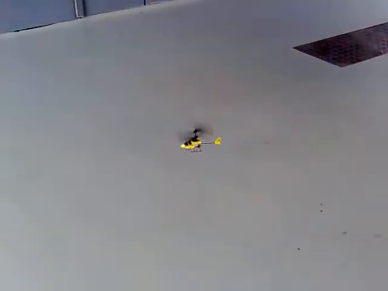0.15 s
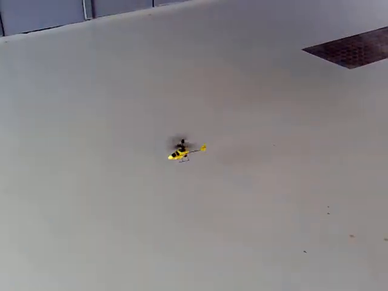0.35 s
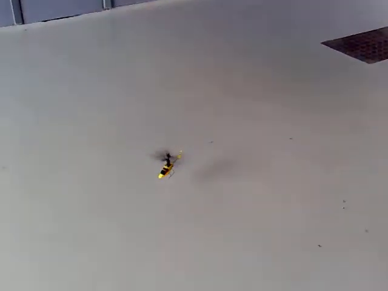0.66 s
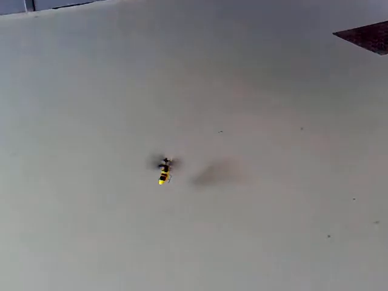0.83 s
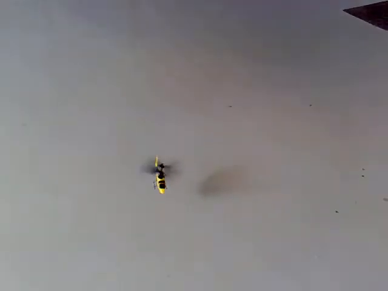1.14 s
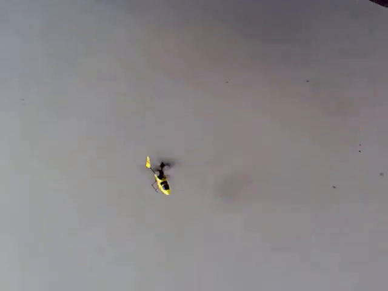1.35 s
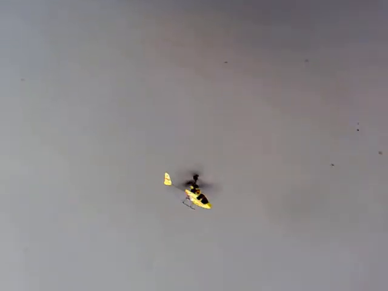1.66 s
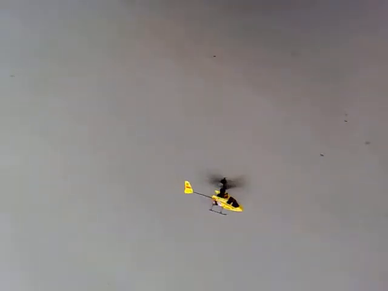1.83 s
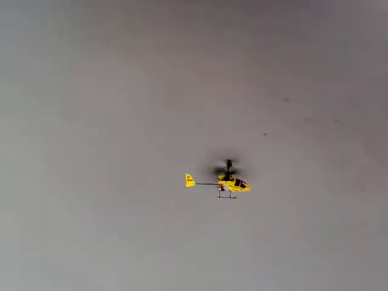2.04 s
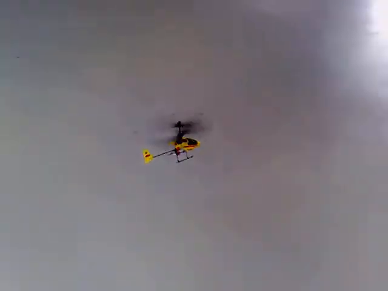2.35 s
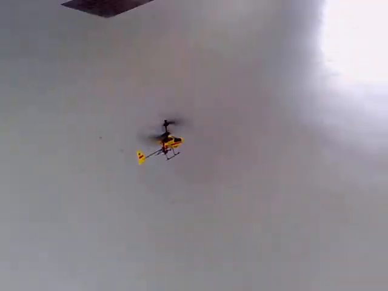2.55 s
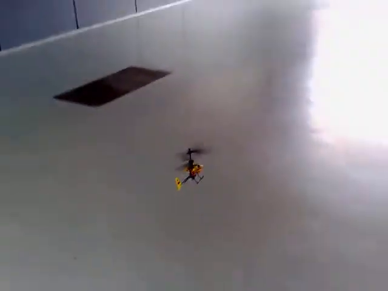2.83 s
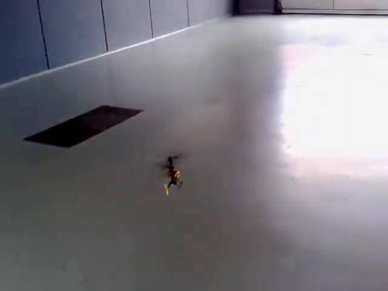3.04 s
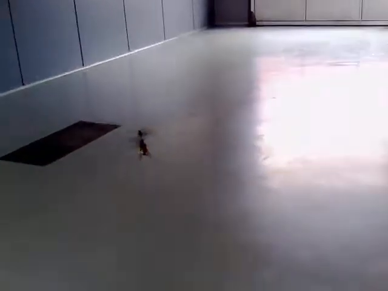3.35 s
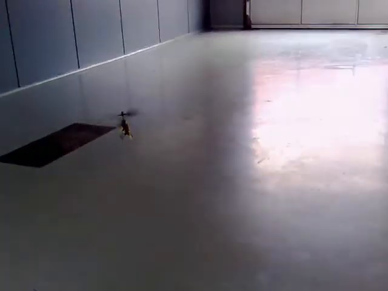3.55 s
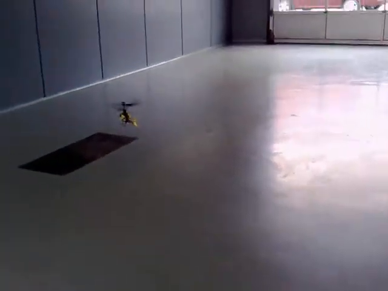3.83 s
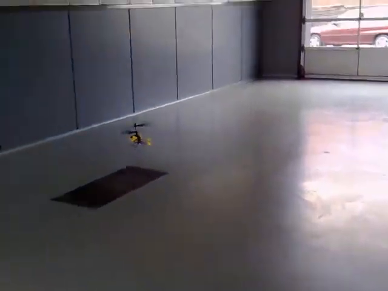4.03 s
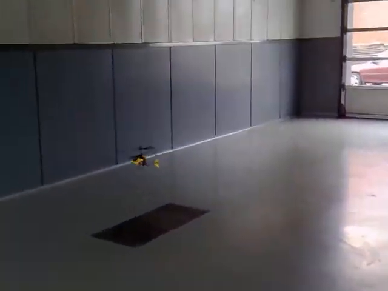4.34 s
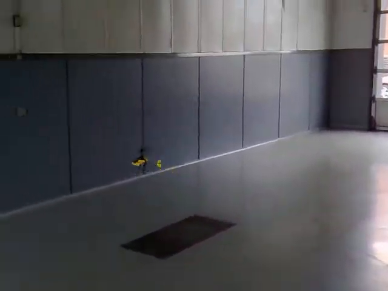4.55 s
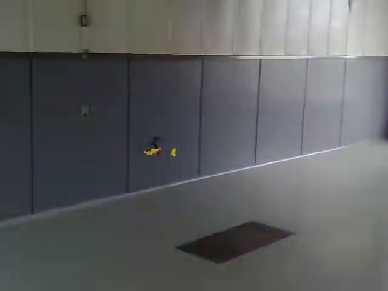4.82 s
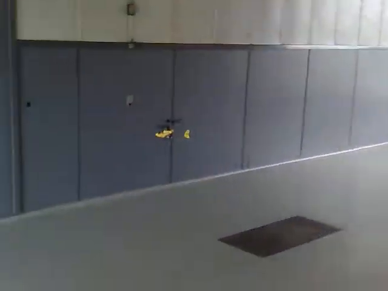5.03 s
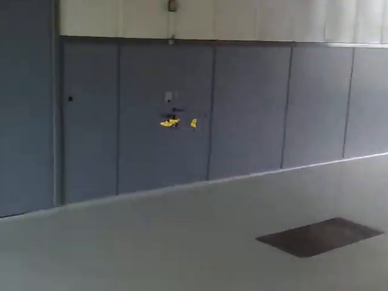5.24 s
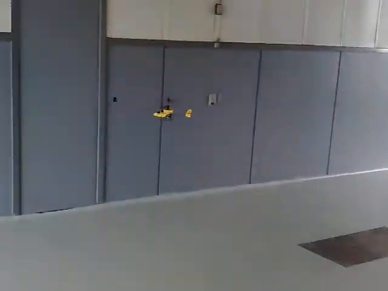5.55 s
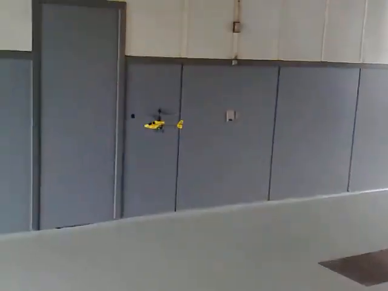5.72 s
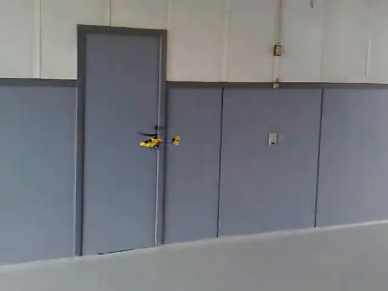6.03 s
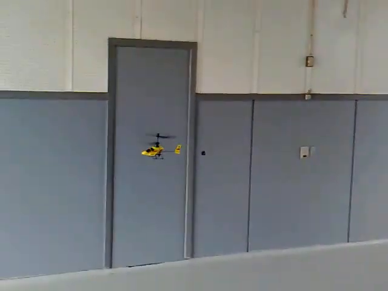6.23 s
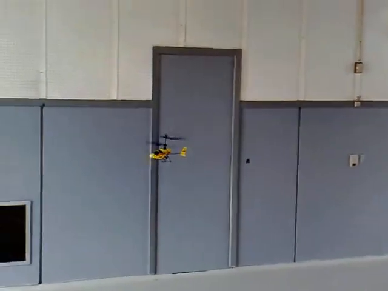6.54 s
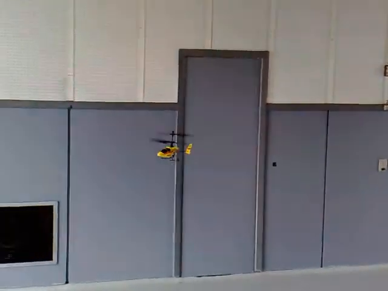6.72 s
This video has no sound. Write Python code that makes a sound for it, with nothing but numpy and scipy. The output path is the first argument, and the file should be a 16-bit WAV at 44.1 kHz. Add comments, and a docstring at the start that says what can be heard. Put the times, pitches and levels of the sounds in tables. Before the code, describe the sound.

A large, hard-surfaced indoor hall with low air rumble and a faint wavering drone. From the start a micro electric helicopter sounds a thin, high, slightly beating whine with light brush and blade hiss; a tiny servo squeal and very high whistles pass in the first second or so, with soft bumps nearby. At about 1.5 seconds a larger, louder model starts unseen with jolting gear clatter. Its rattle becomes a rising whine, with quickening ticks most evident between 2.2 and 4 seconds, and sizzle and rasp growing brighter. Gear tones sweep upward, swelling as they meet resonances. Small taps occur around 2.5 and 3.7 seconds, and a sharp click at about 4.2. By 4.5 seconds the pitch levels off, and a dense, metallic, buzzing whine with weaker ticking holds, swelling briefly near 6 seconds, until the end at nearly 7 seconds.

```python
"""Two model helicopters in an echoing hall

A micro electric helicopter whines: sines locked to its two motor shafts, with noise for its hiss.
After a second and a half a larger, louder model spins up out of sight and holds its speed.
Its gear teeth sing as shaft-locked tones swept through resonances, and rattle as filtered noise.
A pulse once a turn of its main gear makes the ticking; rumble, a drone and bumps lie behind."""
import sys
import numpy as np
from scipy import signal
from scipy.fft import rfft, irfft, next_fast_len
from scipy.io import wavfile
from scipy.ndimage import uniform_filter1d

SR = 44100
rng = np.random.default_rng(int(sys.argv[2]) if len(sys.argv) > 2 else 0)


def dump_mix(stems):
    """Bounce the given channels to the path in sys.argv[1] as a 16-bit WAV at rate SR."""
    frames = np.atleast_2d(stems).T  # one column per channel
    limited = np.clip(frames, -1, 1)  # hard clip at full scale
    pcm = np.round(limited * 32767).astype(np.int16)
    wavfile.write(sys.argv[1], SR, pcm)


N = 303408
TIME = np.arange(N) / SR  # s

# Moving air, in the still hall and in the rotor's wash. Each row: frequency in Hz, relative density in dB.
AIR_SPECTRUM = [(20, -0.5), (35, -1), (60, -3.5), (90, -6), (160, -3), (260, -5.5), (400, -8), (650, -7.5),
                (1000, -7.5), (3000, -28.5)]
# Decay of the reverberation. Each row: frequency in Hz, time to fall by 60 dB in s.
HALL_T60 = [(200, 0.32), (1500, 0.99), (4000, 0.4), (12000, 0.3)]
# Low drone that comes and goes. Each row: time in s, fundamental in Hz, level in dB.
DRONE = [(.5, 56, -69), (.66, 59.4, -55.5), (.85, 50.8, -64.5), (1.1, 53.2, -58.5), (1.35, 55.4, -60),
         (1.65, 61.3, -57), (1.9, 63.6, -67.5), (2.5, 67.3, -64), (2.8, 67.1, -72)]
# Soft bumps and taps nearby. Each row: start in s, level in dB, pitch in Hz, decay time in s.
BUMPS = [(.835, -53, 890, 0.024), (1.155, -50, 246, 0.06), (2.092, -54, 135, 0.21),
         (2.419, -43.5, 104, 0.053), (2.58, -44, 406, 0.027), (2.694, -47.5, 310, 0.1),
         (3.698, -44.5, 400, 0.015), (4.242, -21.5, 2950, 0.0091)]

# Micro motors, trimmed against each other to steer.
# Each row: time in s, upper motor in turns per s, lower motor in turns per s.
MICRO_SPEED = [(0, 390, 343), (.5, 395.8, 338.6), (.76, 390.2, 345.8), (1.02, 390.4, 348),
               (1.25, 394.5, 361), (1.55, 399, 366.3), (2.6, 393.5, 364)]
# Loudness of the micro helicopter as it turns and comes closer. Each row: time in s, gain in dB.
MICRO_LEVEL = [(0, 4), (.4, 3.5), (.65, -2.5), (1.15, -2), (1.4, 1.5), (1.7, -0.5), (2.3, 7.5), (4.0, -5.5),
               (6.88, 6)]
# Partials of the micro motors. Each row: multiple of the shaft speed, relative level in dB.
MICRO_UPPER_ORDERS = [(4, -12), (5, -3), (7, -11.5), (8, -16), (12, -12.5), (14, -14.5), (21, -21)]
MICRO_LOWER_ORDERS = [(5, 1), (7, -13), (10, -12), (14, -14), (15, -25)]
# Brush and blade hiss. Each row: frequency in Hz, relative density in dB.
MICRO_HISS_SPECTRUM = [(700, -41), (1200, -7.5), (1600, 3.5), (2000, 5.5), (2500, -3.5), (3500, -1.5),
                       (4700, -0.5), (5800, -2.5), (7200, -10), (10000, -12), (12000, -5), (16000, -12)]
# Short squeal of the steering servo. Each row: time in s, pitch in Hz, level in dB.
SERVO_SQUEAL = [(.2, 5470, -70), (.3, 5500, -54), (.4, 5535, -51.5), (.5, 5550, -55.5), (.6, 5540, -72)]
# Thin whistles as it steers. Each row: start in s, length in s, start pitch in Hz, end pitch in Hz, level in dB.
WHISTLES = [(0.074, 0.63, 11300, 12600, -61), (1.2, 0.4, 13000, 12600, -57)]

# Throttle run of the large model.
# Each row: time in s, first motor in turns per s, second motor in turns per s.
SPEED = [(1.5, 70, 84), (1.8, 90.4, 108), (2.12, 118.3, 140), (2.85, 168.5, 189), (3.32, 188.3, 214.5),
         (3.47, 194.3, 226.3), (3.75, 205, 240.5), (3.92, 214.3, 246), (4.3, 231, 264), (4.52, 234.6, 267),
         (5.2, 234.5, 268.3), (5.8, 236.3, 265.3), (6.3, 237.7, 264.7), (6.88, 235.8, 264.8)]
# Tooth-mesh tones before resonance.
# Each row: multiple of the shaft speed, level at full speed in dB, rise in dB per octave of speed.
FIRST_MESH = [(8, -34, -1), (16, -33, -1.5), (24, -43, 0)]
SECOND_MESH = [(8, -36.5, 4.2), (16, -34.5, 11)]
# Weaker partials of uneven teeth. Each row: multiple of the shaft speed, relative level in dB.
FIRST_SIDE = [(4, -5.5), (7, -8.5), (9, 1), (10, -3.5), (12, -4.5), (17, -6), (18, -3), (19, -6.5),
              (20, -16), (27, -12.5), (32, -12)]
SECOND_SIDE = [(9, -34), (15, -7), (17, -8), (40, -9.5)]
# Gearbox resonances swept by the mesh tones. Each row: centre in Hz, width in Hz, gain in dB.
GEARBOX = [(1100, 260, 4), (1380, 100, 1), (1650, 186, 5), (1830, 54, -1.5), (1990, 77, 2), (2290, 62, 3.5),
           (2580, 153, 4), (3570, 125, -3.5), (4354, 240, 3), (5290, 230, 8.5)]
# Resonances of the frame. Each row: frequency in Hz, gain in dB.
FRAME = [(600, -10.5), (720, -3), (830, -7.5), (950, -8), (1250, -14.5), (1680, 0.5), (2300, -8),
         (2900, -10.5), (3600, -11), (4300, 0.5), (5200, 5), (7500, -5.5), (11000, 1.5)]
# Mesh whine as it swells and sinks in the hall. Each row: time in s, gain in dB.
WHINE_SWELL = [(2.9, -9), (3.55, 1), (3.9, 2), (4.15, -2), (5.2, 0), (5.88, -1), (6.07, 3.5), (6.3, -2),
               (6.88, 1)]
# Hum of the frame. Each row: multiple of half the shaft speed, relative level in dB.
HUM_ORDERS = [(1, -1), (2, -6.5), (3, -9.5), (4, -9.5), (5, -12.5)]
# Level of that hum. Each row: time in s, level in dB.
HUM_LEVEL = [(3.5, -94), (4.5, -59.5), (5.7, -59), (6.88, -58)]
# Ticking of the main gear, which eases as the rotor takes load.
# Each row: time in s, tick strength as a ratio, ring strength as a ratio.
TICKING = [(2.1, 0.51, 0.25), (2.25, 1.7, 0.47), (2.5, 0.74, 0.45), (3.0, 0.48, 0.8), (3.75, 0.48, 0.97),
           (4.05, 0.075, 0.12), (6.88, 0.13, 0.11)]
# Jolts of the gears as the motors catch. Each row: time in s, rattle level in dB.
JOLTS = [(1.5, -41.5), (1.675, -43), (1.89, -58)]
# Rasp as it swells and sinks. Each row: time in s, gain in dB.
RASP_SWELL = [(3.9, -1.5), (4.55, -4), (5.9, 1), (6.88, -1.6)]
# Gear and bearing noise, and the high resonance of the gears.
# Each row: frequency in Hz, relative density in dB.
RATTLE_SPECTRUM = [(450, -51), (720, -20.5), (930, 2.5), (1250, -2.5), (1650, 3.5), (2200, 2), (2700, -1.5),
                   (3200, -4), (5000, -37)]
RASP_SPECTRUM = [(1800, -58), (2700, -3.5), (3400, -1.5), (4300, 6), (5000, 3), (6200, 0.5), (7300, -5.5),
                 (9000, -13), (12000, -20)]
SIZZLE_SPECTRUM = [(5000, -32.5), (8000, -5), (8900, -4), (9600, 1), (10600, 3), (11600, 1.5), (12800, -1),
                   (14200, -6), (16000, -15)]
RING_SPECTRUM = [(8500, -37), (10400, -10), (11300, 9), (11800, 2), (12400, -12), (14500, -30)]
# Growth of each gear noise with speed up to a knee, and with the load of accelerating.
# Each holds: level above the knee in dB, knee in turns per s, slope below it in dB per octave,
# addition at full load in dB.
RATTLE_LAW = (-38, 151, 8, 3.5)
RASP_LAW = (-33.5, 171, 16.5, 1.3)
SIZZLE_LAW = (-32, 168.5, 28.5, 2.5)

STILL_AIR_DB = -60.5
WASH_DB, WASH_DB_PER_OCTAVE = -52.5, 5  # at full speed; rise with speed
MICRO_UPPER_WHINE_DB, MICRO_LOWER_WHINE_DB, MICRO_HISS_DB = -49, -53.5, -48.5  # before MICRO_LEVEL
MICRO_HISS_FOLLOWS = 0.26  # share of the whine's swing in dB
GEAR_RATIO = 7.42  # motor turns per turn of the main gear
FIRST_RUNOUT, SECOND_RUNOUT = 0.034, 0.018  # shaft swing from the off-centre main gear, radians
MESH_FADE_DB, MESH_FADE_HZ = 0.8, 3.9  # random swell and fade of each mesh tone
MESH_CATCH_S, MESH_CATCH_RISE_S = 1.644, 0.47  # teeth clatter at first, then lock into a tone
RADIATION_HZ = 910  # the gearbox radiates little below this
FIRST_TICK_S = 2.256  # sets the phase of the ticking
JOLT_DECAY_S, LOAD_SMOOTHING_S = 0.077, 1.6
CUTOFF_HZ = 15900


def from_db(db):
    """Amplitude ratio: twenty decibels are a factor of ten."""
    return 10 ** (np.asarray(db) / 20)


def rms_one(x):
    """Normalisation to unit mean power."""
    return x / np.sqrt(np.mean(x ** 2) + 1e-20)


def in_time(rows):
    """Linear interpolation of each column of a curve at every sample."""
    s, *columns = np.transpose(rows)
    return [np.interp(TIME, s, column) for column in columns]


def at_hz(rows, hz):
    """Interpolation of a table along a logarithmic frequency axis."""
    table_hz, value = np.transpose(rows)
    return np.interp(np.log(hz + 1e-3), np.log(table_hz), value)


def started(rows):
    """Onset gate: silence until a curve begins, then a short linear rise."""
    return np.clip((TIME - rows[0][0]) / 0.037, 0, 1)


def noise(spectrum):
    """Spectral shaping: white noise weighted in frequency, at unit power."""
    size = next_fast_len(N)
    gain = from_db(at_hz(spectrum, np.fft.rfftfreq(size, 1 / SR)))
    white = rng.standard_normal(N)
    return rms_one(irfft(rfft(white, size) * gain, size)[:N])


def drift(rate_hz):
    """Low-pass random motion: noise through two equal poles at rate_hz, with unit spread."""
    step = 40  # computed at every 40th sample
    pole = np.exp(-2 * np.pi * rate_hz * step / SR)
    white = rng.standard_normal(N // step + 2002)
    slow = signal.lfilter([1], [1, -2 * pole, pole * pole], white)[2000:]  # settled part
    return np.interp(np.arange(N) / step, np.arange(len(slow)), rms_one(slow))


def shaft(speed, wander, judder):
    """Phase as the integral of speed, with slow wander and fast judder as fractions of that speed."""
    unsteady = speed * (1 + wander * drift(4.063) + judder * drift(44.5))
    return 2 * np.pi * np.cumsum(unsteady) / SR


def partials(angle, orders, flutter_db):
    """Order analysis reversed: sines at multiples of a shaft's phase, each fluttering by itself."""
    out = 0
    for order, db in orders:
        strength = np.sqrt(2) * from_db(db + flutter_db * drift(8.5))
        out = out + strength * np.sin(order * angle + rng.uniform(0, 2 * np.pi))
    return out


def hall(x, wet_db):
    """Diffuse reverberation: direct sound plus noise bands that each decay exponentially at their own rate."""
    t = TIME[:2 * SR]
    edges, tail = np.geomspace(100, 16000, 8), 0
    for low, high in zip(edges, edges[1:]):
        band_filter = signal.butter(2, [low, high], "band", fs=SR, output="sos")
        band = signal.sosfilt(band_filter, rng.standard_normal(len(t)))
        tail = tail + band * from_db(-60 * t / at_hz(HALL_T60, np.sqrt(low * high)))
    build_up = np.clip(t / 0.012, 0, 1)
    # scale by the energy of an exponential decay
    tail = tail * build_up * np.sqrt(np.log(1e6) / (at_hz(HALL_T60, 2000) * SR))
    wet = from_db(wet_db)
    return (x + wet * signal.fftconvolve(x, tail)[:N]) / np.sqrt(1 + wet ** 2)


def drone():
    """Harmonic tone: a fundamental and its octave share one wavering phase."""
    hz, db = in_time(DRONE)
    angle = shaft(hz, wander=0.011, judder=0.032)
    return from_db(db) * partials(angle, [(1, 0.5), (2, -1.5)], flutter_db=6.5)


def bumps():
    """Impact: a band of noise rises at once and decays exponentially."""
    out = 0
    for s, db, hz, decay_s in BUMPS:
        age = np.maximum(TIME - s, 0)
        band_filter = signal.butter(2, [hz * 0.6, hz * 1.32], "band", fs=SR, output="sos")
        thud = rms_one(signal.sosfilt(band_filter, rng.standard_normal(N)))
        out = out + from_db(db) * thud * (1 - np.exp(-age / 0.0009)) * np.exp(-age / decay_s)
    return out


def background():
    """Superposition of hall rumble, an unsteady hum, the drone and the bumps."""
    rumble = from_db(STILL_AIR_DB) * noise(AIR_SPECTRUM)
    hum_angle = shaft(257, wander=0.00587, judder=0.026)  # Hz
    hum = from_db(-72.5) * partials(hum_angle, [(1, 0)], flutter_db=2.5)
    return rumble + hum + drone() + bumps()


def whistles():
    """Frequency glide: each sine slides linearly, wavers, and fades in and out by a half sine."""
    out = 0
    for s, length, start_hz, end_hz, db in WHISTLES:
        part = np.clip((TIME - s) / length, 0, 1)
        angle = shaft(start_hz + (end_hz - start_hz) * part, wander=0.008, judder=0.012)
        out = out + from_db(db) * np.sin(np.pi * part) * np.sqrt(2) * np.sin(angle)
    return out


def servo_squeal():
    """Frequency modulation: one sine follows a pitch curve with slight unsteadiness."""
    hz, db = in_time(SERVO_SQUEAL)
    return from_db(db) * np.sqrt(2) * np.sin(shaft(hz, wander=0.0019, judder=0.0023))


def micro_helicopter():
    """Rotational tones of two tiny motors, with squeal and whistles in the hall and a direct hiss."""
    level_db, = in_time(MICRO_LEVEL)
    upper_speed, lower_speed = in_time(MICRO_SPEED)
    motors = [(upper_speed, MICRO_UPPER_WHINE_DB, MICRO_UPPER_ORDERS),
              (lower_speed, MICRO_LOWER_WHINE_DB, MICRO_LOWER_ORDERS)]
    whine = 0
    for speed, motor_db, orders in motors:
        angle = shaft(speed, wander=0.00055, judder=0.0021)
        whine = whine + from_db(motor_db + level_db) * partials(angle, orders, flutter_db=0)
    hiss_db = MICRO_HISS_DB + MICRO_HISS_FOLLOWS * level_db + 0.93 * drift(36)
    hiss = from_db(hiss_db) * noise(MICRO_HISS_SPECTRUM)
    return hall(whine + servo_squeal() + whistles(), wet_db=0) + hiss


def octaves_below(speed, top):
    """Logarithmic interval by which a speed lies under a top speed."""
    return np.log2(np.maximum(top / speed, 1))


def load_of(speed):
    """Inertial load: the smoothed acceleration, scaled to a peak of one."""
    push = uniform_filter1d(np.gradient(speed), int(LOAD_SMOOTHING_S * SR))
    return push / push.max()


def noise_db(law, speed, load):
    """Power law of speed below a knee, in decibels, plus a share for load."""
    top_db, knee, db_per_octave, load_db = law
    return top_db - db_per_octave * octaves_below(speed, knee) + load_db * load


def gear_noise(speed, load):
    """Amplitude modulation: rattle, rasp and sizzle pulse with a tight spot once a main-gear turn."""
    rattle_db = noise_db(RATTLE_LAW, speed, load)
    rasp_db = noise_db(RASP_LAW, speed, load) + in_time(RASP_SWELL)[0]
    sizzle_db = noise_db(SIZZLE_LAW, speed, load)
    turns = np.cumsum(speed) / (GEAR_RATIO * SR)
    turns = turns - np.interp(FIRST_TICK_S, TIME, turns)
    tick = np.exp(8 * (np.cos(2 * np.pi * turns) - 1)) * from_db(1.9 * drift(8))
    knock, ring = in_time(TICKING)

    # the rattle begins in jolts, then runs on as the slack is taken up
    jolts = 0
    for s, db in JOLTS:
        jolts = jolts + from_db(db) * (TIME > s) * np.exp(-np.abs(TIME - s) / JOLT_DECAY_S)
    engaged = np.clip((TIME - SPEED[0][0]) / 0.31, 0, 1)
    rattle_level = np.hypot(jolts, engaged * from_db(rattle_db)) * from_db(1.16 * drift(25))
    rattle = rattle_level * noise(RATTLE_SPECTRUM) * rms_one(1 + 0.24 * tick)

    rasp_level = from_db(rasp_db + 0.76 * drift(27))
    rasp = rasp_level * noise(RASP_SPECTRUM) * rms_one(1 + 0.23 * knock * tick)

    # a high resonance joins the sizzle by the ring strength
    bright = (noise(SIZZLE_SPECTRUM) + ring * noise(RING_SPECTRUM)) / np.hypot(1, ring)
    sizzle = from_db(sizzle_db + 0.86 * drift(40)) * bright
    sizzle = sizzle * (1 + knock * tick) / (1 + 0.26 * knock)
    return started(SPEED) * (rattle + rasp + sizzle)


def gearbox_db(hz):
    """Resonance: summed Lorentzian power peaks, with weak radiation of low pitches."""
    power = 0
    for centre, width, db in GEARBOX:
        power = power + from_db(db) ** 2 / (1 + (2 * (hz - centre) / width) ** 2)
    return 10 * np.log10(power / (1 + (RADIATION_HZ / hz) ** 10))


def mesh_tones(angle, speed, orders):
    """Forced resonance: tooth-mesh tones flare as their pitches cross the gearbox resonances."""
    swell_db, = in_time(WHINE_SWELL)
    slow = octaves_below(speed, speed.max())
    out = 0
    for order, db, db_per_octave in orders:
        gain_db = swell_db - db_per_octave * slow + gearbox_db(order * speed)
        gain_db = gain_db + MESH_FADE_DB * drift(MESH_FADE_HZ)
        out = out + from_db(gain_db) * partials(angle, [(order, db)], flutter_db=2.78)
    return out


def side_tones(angle, speed, orders, level_db):
    """Phase jitter: uneven teeth give rougher shaft orders, weighted by the frame resonances."""
    out = 0
    for order, db in orders:
        loose_angle = angle + 0.7 * (speed.max() / speed) * drift(40.5) / order
        strength = from_db(level_db + at_hz(FRAME, order * speed))
        strength = strength * (speed / speed.max()) ** 1.03  # teeth hit harder at speed
        out = out + strength * partials(loose_angle, [(order, db)], flutter_db=3)
    return out


def geared_motor(speed, mesh_orders, side_orders, side_db, wander, judder, runout):
    """Gear meshing: an eight-tooth pinion on an off-centre main gear, whose turn sways pitch and level."""
    # gear play judders more at low speed
    angle = shaft(speed, wander=wander, judder=judder * (speed.max() / speed) ** 0.814)
    angle = angle + runout * np.sin(angle / GEAR_RATIO)
    tones = mesh_tones(angle, speed, mesh_orders) + side_tones(angle, speed, side_orders, side_db)
    # the teeth press harder once a main-gear turn, in step with the tick strength
    throb = np.clip(0.39 * in_time(TICKING)[0], 0, 1)
    tones = tones * (1 + throb * np.cos(angle / GEAR_RATIO)) / np.sqrt(1 + throb ** 2 / 2)
    caught = np.clip((TIME - MESH_CATCH_S) / MESH_CATCH_RISE_S, 0, 1)
    # small parts radiate little bass
    bass_cut = signal.butter(5, 740, "high", fs=SR, output="sos")
    return signal.sosfilt(bass_cut, caught * tones)


def large_model():
    """Superposition of two geared motors in the hall, gear noise, frame hum and the rotor's wash."""
    speed, second_speed = in_time(SPEED)
    load = load_of(speed)
    side_db = noise_db(RATTLE_LAW, speed, load) + 1.5
    first = geared_motor(speed, FIRST_MESH, FIRST_SIDE, side_db,
                         wander=0.0018, judder=0.00551, runout=FIRST_RUNOUT)
    second = geared_motor(second_speed, SECOND_MESH, SECOND_SIDE, side_db,
                          wander=0.00101, judder=0.00392, runout=SECOND_RUNOUT)
    half_angle = shaft(speed / 2, wander=0.00086, judder=0.0032)
    hum = from_db(in_time(HUM_LEVEL)[0]) * partials(half_angle, HUM_ORDERS, flutter_db=1)
    wash_db = WASH_DB - WASH_DB_PER_OCTAVE * octaves_below(speed, speed.max())
    wash = started(SPEED) * from_db(wash_db) * noise(AIR_SPECTRUM)
    return hall(first + second, wet_db=-0.5) + gear_noise(speed, load) + hum + wash


def scene():
    """Linear superposition of the hall and both models at one microphone."""
    return (background() + micro_helicopter() + large_model())[None]


def record(dry):
    """Band limiting: a steep elliptic low-pass removes the extreme treble."""
    low_pass = signal.ellip(12, 0.1, 80, CUTOFF_HZ, fs=SR, output="sos")
    return signal.sosfilt(low_pass, dry)


dry = scene()
out = record(dry)
dump_mix(out)
```